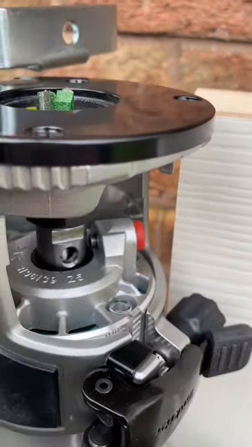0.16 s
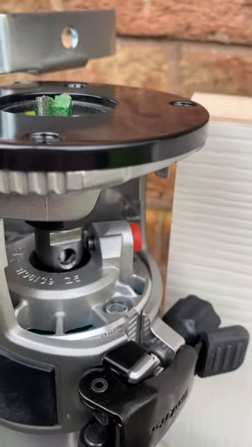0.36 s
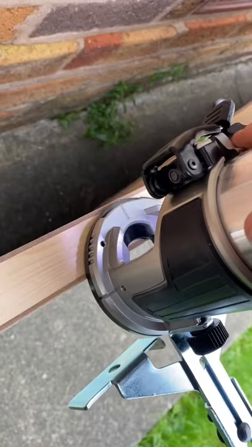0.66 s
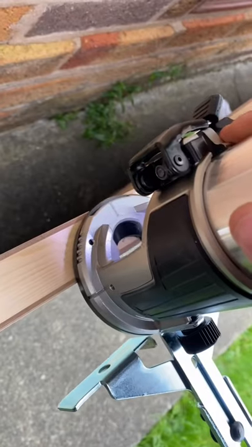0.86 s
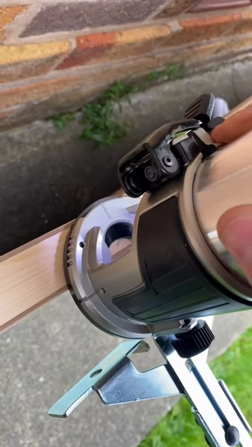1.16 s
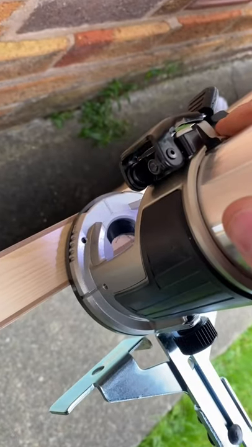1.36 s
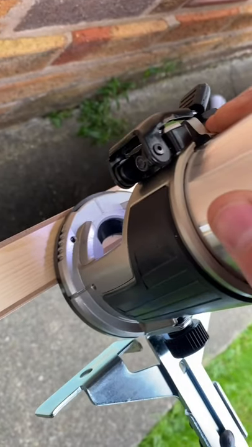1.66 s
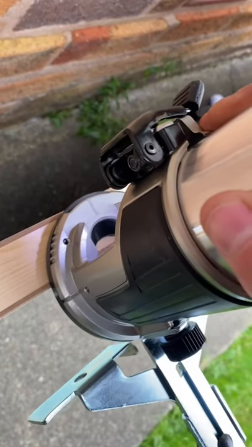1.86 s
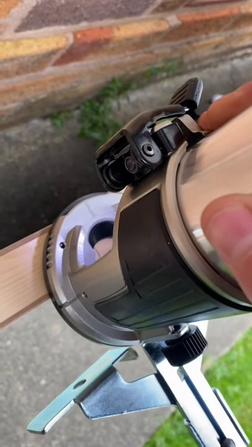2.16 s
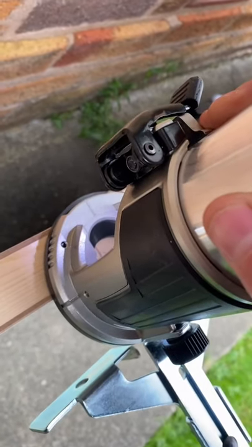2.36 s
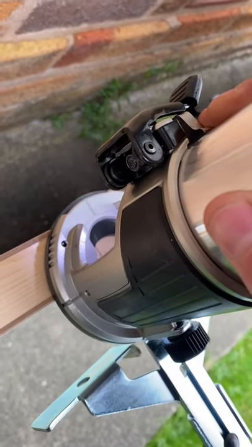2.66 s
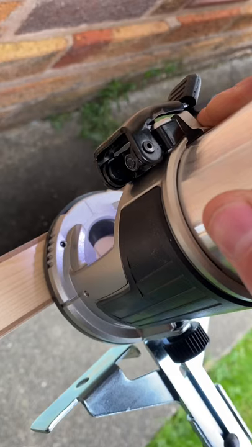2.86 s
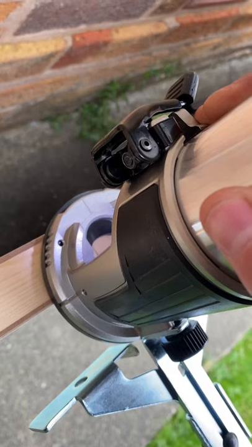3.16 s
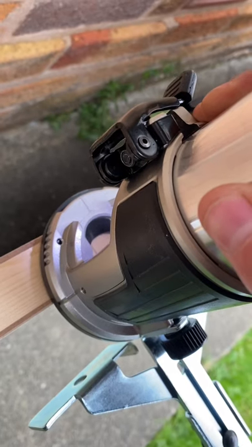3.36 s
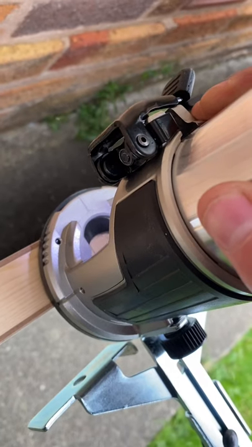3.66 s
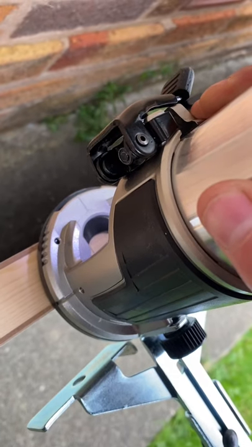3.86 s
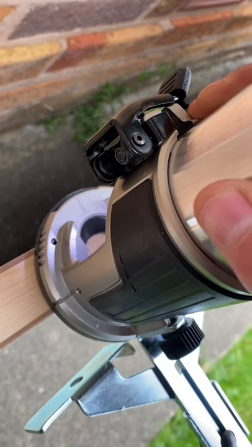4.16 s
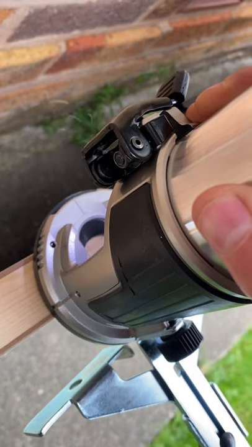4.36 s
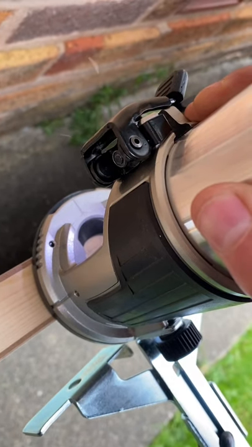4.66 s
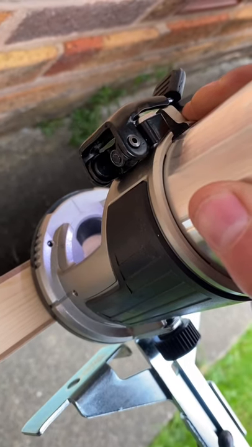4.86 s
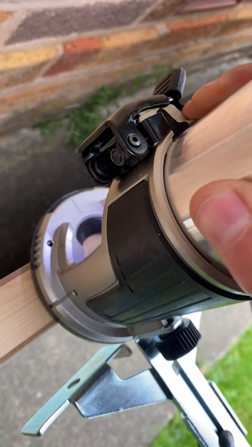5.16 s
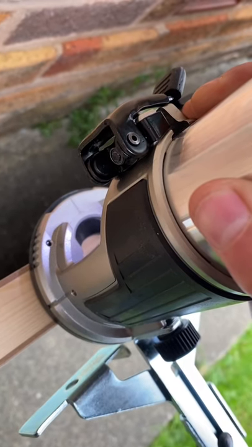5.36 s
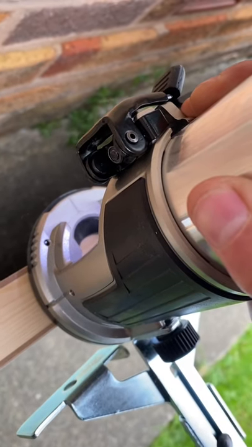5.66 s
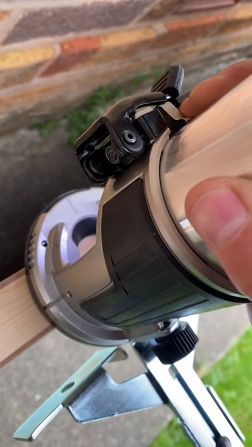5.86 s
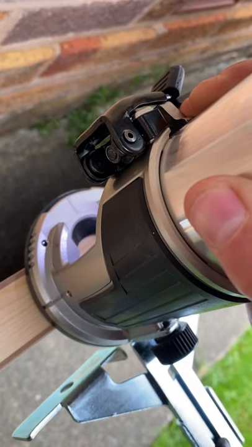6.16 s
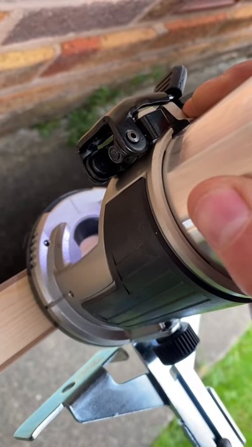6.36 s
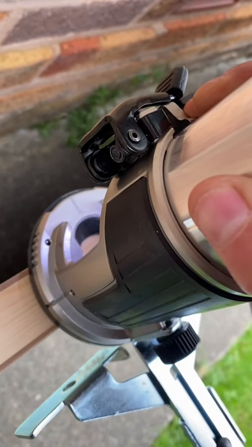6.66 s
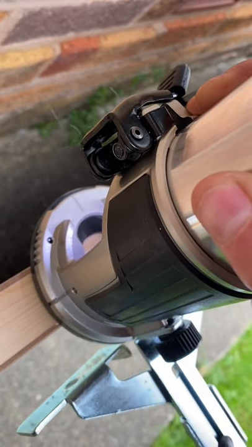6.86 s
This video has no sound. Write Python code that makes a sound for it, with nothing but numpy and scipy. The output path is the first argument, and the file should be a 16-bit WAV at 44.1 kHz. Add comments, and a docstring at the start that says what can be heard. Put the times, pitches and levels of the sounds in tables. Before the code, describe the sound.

After half a second of quiet outdoor air with a small knock, a palm router bursts in at full speed, whining steadily while trimming a wooden edge.

```python
"""Palm router on a door edge

A cordless palm router trims a wooden door's edge, close to a phone with two microphone ports.
A quiet half second outdoors holds a small knock; then the motor is there at once, near 29000 rpm.
Partials locked to the shaft make whine, hum and rasp, and a bearing tone beats against the whine.
Noise shaped by resonances makes the rush of air and chips; a shrill tone tracks the shaft.
The speed sags a little in the cut, and low noise under brief swells makes a buffeting breeze."""
import sys
import numpy as np
from scipy import signal
from scipy.fft import rfft, irfft
from scipy.io import wavfile

SR = 44100
rng = np.random.default_rng(int(sys.argv[2]) if len(sys.argv) > 2 else 0)


def to_wav(s):
    """Save 16-bit WAV."""
    ch = np.atleast_2d(s).T  # columns
    pcm = np.round(np.clip(ch, -1, 1) * 32767)  # PCM
    wavfile.write(sys.argv[1], SR, pcm.astype(np.int16))


N = 309582
T = np.arange(N) / SR
FREQ = np.maximum(np.fft.rfftfreq(N, 1 / SR), 1)
SIDES = np.array([[1], [-1]])  # left, right
CUT_S = .5448  # the router is heard from here


def router():
    """Common drive: one shaft turns every part, and the sag of its speed measures the load of the cut."""
    # shaft speed, which sags as the bit is pushed into the wood: t/s, f/Hz
    speed = [(.55, 489.2), (1.25, 489.6), (1.5, 490.3), (1.92, 490.4), (2.08, 489), (2.2, 486.5),
             (2.45, 484.9), (2.62, 485.1), (3.0, 483.3), (3.2, 481.2), (3.5, 479.7), (3.78, 481),
             (3.98, 479.7), (4.5, 480.5), (4.8, 482.6), (5.07, 482.3), (5.3, 485), (5.6, 484.2),
             (5.92, 488), (6.27, 488), (6.9, 483.7)]
    # fan whine, then bearing tone: level running free at the start/dB, change at full load/dB,
    # growth along the cut/(dB per s)
    whine_rule = (-30.5, 1, 0.43)
    ball_rule = (-38.7, -5.5, .95)
    free_hz, loaded_hz = 491, 480  # speeds that count as no load and full load
    shaft_hz, = curves(speed)
    load = np.clip((free_hz - shaft_hz) / (free_hz - loaded_hz), 0, 1)
    turns = np.cumsum(shaft_hz + 0.35 * walk(15.3)) / SR
    tones = motor(turns, load, loaded(whine_rule, load))
    tones = tones + bearing(turns, loaded(ball_rule, load))
    return ports(tones) + harmonics(turns, load) + shrill(shaft_hz) + rush(turns, load)


def motor(turns, load, whine_db):
    """Harmonic series: fan, shaft and bit sound at whole multiples of the shaft speed."""
    # octave of the whine, which fades as the tool moves along: t/s, level/dB
    octave_level = [(.55, -29.3), (1.25, -27), (2.2, -29), (2.55, -33), (2.9, -31.5), (3.3, -35.5),
                    (3.8, -33.5), (4.5, -39.5), (5.7, -38.5), (6.2, -35.5), (6.8, -40)]
    # hum of the unbalanced shaft, once a turn: t/s, level/dB
    hum_level = [(.55, -45.7), (1.55, -43.2), (2.0, -46), (2.3, -51.5), (3.6, -51), (5.6, -46.7),
                 (5.9, -43.2), (6.5, -41.2), (7, -43.7)]
    # second harmonic, the flutes whirring freely until the bit bites: t/s, level/dB
    flute_level = [(.55, -37.5), (1.6, -40), (2.1, -38), (2.6, -37.5), (3.2, -45.5), (4.6, -46), (5.9, -43),
                   (6.8, -38.5)]
    # third harmonic, the drone of the bit as it bites: t/s, level relative to bite_base_db/dB
    bite_level = [(.55, -59), (2.3, -45), (2.55, -35.5), (3.0, -32.5), (4.2, -36), (4.8, -33.5), (5.1, -40),
                  (5.5, -34.5), (7, -42)]
    # fifth harmonic and its octave, a rasp that comes and goes in the cut:
    # t/s, level and level of the octave, both relative to rasp_base_db/dB
    rasp_levels = [(.55, -44, -54), (2.25, -44, -52), (2.65, -38.5, -39), (3.0, -42, -41),
                   (3.4, -35.5, -40), (3.75, -42, -47), (4.4, -47, -53), (4.75, -44, -43), (6.05, -44, -47),
                   (6.5, -38, -45), (6.8, -40, -42), (7, -42, -45)]
    bite_base_db, rasp_base_db = -.7, -1.5
    whine = tone(4 * turns, whine_db, waver_db=.5, rough=.1)
    octave = tone(8 * turns, curves(octave_level)[0], waver_db=.4, rough=.12 + .18 * load)
    hum = tone(turns, curves(hum_level)[0], waver_db=1.0, rough=.25)
    flutes = tone(2 * turns, curves(flute_level)[0], waver_db=.8, rough=.4)
    bite = tone(3 * turns, bite_base_db + curves(bite_level)[0], waver_db=-1.5, rough=0.34)
    rasp = sum(tone(k * turns, rasp_base_db + db, waver_db=1.2, rough=.4)
               for k, db in zip((5, 10), curves(rasp_levels)))
    return whine + octave + hum + flutes + bite + rasp


def harmonics(turns, load):
    """Directional radiation: each weaker harmonic has its own phase lag between the ports."""
    # multiple of shaft speed, level running free/dB, change at full load/dB,
    # change by the end of the cut/dB, phase by which left leads/rad
    orders = [(6, -46.5, 9.5, -8.5, -2), (7, -43, 2, -7, -1.5), (9, -51.5, 10, -1, 2.5),
              (11, -52, 0, -2, 2.5), (14, -61, 0, -2, 2.8), (16, -57, 1, -5, -5.5)]
    total = 0
    for k, db, load_db, late_db, lead in orders:
        port_turns = round(k) * turns + SIDES * lead / (4 * np.pi)
        level_db = db + load_db * load + slide(0, late_db)
        total = total + tone(port_turns, level_db, waver_db=1.0, rough=0.22)
    return total


def bearing(turns, ball_db):
    """Beating: slightly slipping balls pass just off the fourth harmonic, about 48 beats a second."""
    # ball-pass tone and its shaft sidebands: multiple of shaft speed
    ball_orders = (4.098, 4.9, 5.1)
    # the same tones: level relative to ball_db/dB
    order_levels = (1, -19, -23)
    slip_hz = 1.8  # rms
    slip = np.cumsum(slip_hz * walk(13.2)) / SR
    return sum(tone(k * turns + slip, ball_db + db, waver_db=1.0, rough=.15)
               for k, db in zip(ball_orders, order_levels))


def rush(turns, load, chop=0.082, chip_db=-10, chip_rate=4000, flutter_db=0.46):
    """Source and filter: air noise and chip impulses, pulsing once a turn, ring housing and base."""
    # broad colour of the rushing air: f/Hz, density/(dB per Hz)
    air_colour = [(30, -40), (70, -24), (130, -15.5), (200, -17.3), (400, -11.6), (620, -6.2), (900, .8),
                  (1400, -9.2), (2000, -5.1), (3700, -6.4), (5000, -4.5), (7000, -6.4), (7550, -3),
                  (8100, -6.8), (9700, -12.1), (11300, -9.9), (15500, -18.3)]
    # resonances and dips of housing and base: f/Hz, width/Hz, lift early in the cut/dB, lift late/dB
    housing = [(234, 73, 6.3, 6.4), (530, 50, 2.5, 2.5), (650, 70, -1.8, -1.8), (770, 38, 1.4, 1.1),
               (1000, 90, 1.2, 1.2), (1156, 119, 8.5, 7.6), (1374, 207, 14.6, 15.8), (1670, 240, 7, 6.3),
               (2098, 97, -5.4, -7.2), (2231, 167, 9.6, 8.9), (2410, 90, -1.5, 5), (2703, 188, 2.5, -1.5),
               (3009, 362, 6.5, 9), (3290, 150, -5.2, 1.2), (3547, 130, -4, 2.8), (3871, 274, 6.4, .6),
               (4081, 245, -4.4, -2.8), (4343, 112, -1.5, -5.1), (4848, 285, 2.4, 1.3), (5239, 120, -3, -1),
               (5423, 334, 3.3, -2.8), (5650, 200, 1.2, 2.2), (6302, 155, 2.3, 2.6), (6663, 303, 3.2, 3),
               (8888, 432, 3.9, 2.4)]
    # close echoes off base, door and brick wall: delay/s, level/dB
    reflections = [(.0024, -26), (.0041, -24), (.0082, -25), (.0112, -28)]
    # hollow ring of the opening in the base as it slides onto the wood: t/s, f/Hz, level/dB
    opening = [(2.9, 2900, -52), (3.6, 2950, -43), (4.4, 3040, -39), (5.6, 3100, -35.5), (7, 3150, -36.5)]
    level_db = -23.5 - 0.15 * load
    treble_db = 1.25 - 1.1 * load
    air = rng.standard_normal((2, N))
    # chips strike at random instants, chip_rate of them a second on average
    chips = (rng.random((2, N)) < chip_rate / SR) * rng.standard_normal((2, N))
    pulse = 1 + chop * np.sin(2 * np.pi * turns)
    drive = (air + undb(chip_db) * unit(chips)) * pulse * undb(flutter_db * walk(26))
    echoes = 1 + sum(undb(db) * np.exp(-2j * np.pi * FREQ * s) for s, db in reflections)
    lifts = sum(np.outer(dbs, abs(resonance(hz, width)) ** 2) for hz, width, *dbs in housing)
    early, late = (unit(shape(drive, undb(colour(air_colour) + lift) * echoes)) for lift in lifts)
    sound = slide(early, late)
    # the growl of the housing throbs
    growl = shape(sound, abs(resonance(1150, 700)) ** 2) * .13 * walk(60)
    # the spray of dust comes unevenly, a puff each turn, and lifts the top
    puff_db = treble_db + .6 * walk(30) + .35 * np.sin(2 * np.pi * turns)
    spray = shape(sound, 1 / (1 + (8500 / FREQ) ** 6)) * (undb(puff_db) - 1)
    hollow_hz, hollow_db = curves(opening)
    hollow = np.array([ring(hollow_hz, width_hz=110) for _ in range(2)]) * undb(hollow_db)
    return ports(*((sound + growl + spray) * undb(level_db) + hollow))


def shrill(shaft_hz, drift_hz=6, flutter_hz=22, late_pan_db=-10):
    """Inharmonic shaft order: a shrill tone, probably a second bearing, steadier and to the right late."""
    # shrill tone near 9.65 times shaft speed: t/s, level/dB, multiple of shaft speed, steadiness/0-1
    shrill_course = [(.55, -42, 9.65, 0), (.95, -36, 9.63, .2), (1.3, -33, 9.635, .3),
                     (1.65, -33, 9.64, .4), (1.95, -41, 9.64, .1), (2.25, -39, 9.64, .2),
                     (2.6, -45, 9.65, 0), (3.7, -52, 9.65, 0), (4.9, -43, 9.68, .3),
                     (5.35, -38.5, 9.69, .8), (5.9, -36, 9.7, .8), (6.2, -40.5, 9.71, .6),
                     (6.65, -38, 9.71, .8), (7, -40.5, 9.71, .7)]
    # fainter, higher shrill tone: multiple of shaft speed, level/dB, width/Hz
    upper_shrill = (13.76, -45, 30)
    db, order, steady = curves(shrill_course)
    hz = order * shaft_hz + drift_hz * walk(3.01)
    line = tone(np.cumsum(hz) / SR, 0, waver_db=1.2, rough=.3)
    lower = np.sqrt(steady) * line + np.sqrt(1 - steady) * ring(hz, flutter_hz)
    pan = undb(SIDES * slide(0, late_pan_db) / 2)
    pan = pan / np.sqrt(np.mean(pan ** 2, axis=0))  # keeps the power of the pair
    upper_order, upper_db, upper_width_hz = upper_shrill
    upper = ring(upper_order * shaft_hz, upper_width_hz) * undb(upper_db)
    return ports(lower * undb(db)) * pan + ports(upper)


def scuff():
    """Friction noise: the base rubs the door once, a short, dull band under a bell-shaped swell."""
    # t/s at the peak, length/s, level/dB, f/Hz, width/Hz
    rub = (1.2, .075, -46, 180, 80)
    s, length, db, hz, width = rub
    return ring(hz, width_hz=width) * undb(db) * np.exp(-((T - s) / length) ** 2)


def breeze(flurry_db=-6):
    """Wind turbulence: low buffets nearly alike at both ports; stronger ones reach higher in pitch."""
    # colour of the wind: f/Hz, density/(dB per Hz)
    wind_colour = [(20, -26), (40, -3.5), (68, 2.5), (100, -4), (160, -14), (300, -36), (800, -45),
                   (3000, -78)]
    gust = gusts()
    mid, side = (unit(shape(n, undb(colour(wind_colour)))) for n in rng.standard_normal((2, N)))
    flurry_gain = undb(flurry_db) * np.sqrt(gust / gust.max()) * (T > CUT_S)
    flurry = ring(140, width_hz=48) * flurry_gain
    return (mid + flurry + 0.18 * side * SIDES) * gust


def gusts():
    """Power addition: an unsteady breeze and brief buffets, which swell and die alike, join as rms."""
    # steady breeze while the motor runs: t/s, level relative to base_db/dB
    steady_level = [(0.56, -77), (1.3, -60), (2.1, -50), (2.82, -61), (3.29, -51), (3.81, -59.5),
                    (4.92, -44.5), (5.28, -56), (6.34, -52), (7.0, -60)]
    # strongest buffets on top of it: t/s at the peak, level/dB, length/s
    buffet_list = [(0.285, -44, 0.026), (0.372, -46, 0.03), (1.483, -40.5, 0.03), (1.557, -48, 0.03),
                   (2.008, -47, 0.036), (2.093, -51, 0.029), (2.174, -41, 0.035), (2.259, -45, 0.036),
                   (2.435, -42.5, 0.05), (3.13, -49, 0.05), (3.383, -49, 0.046), (4.113, -47, 0.03),
                   (4.277, -41, 0.055), (4.432, -47, 0.041), (4.7, -37, 0.041), (4.806, -50, 0.045),
                   (4.977, -40, 0.036), (5.052, -45, 0.045), (5.27, -44, 0.05), (5.527, -41.5, 0.04),
                   (5.68, -39, 0.033), (5.877, -43, 0.047), (6.424, -48, 0.037)]
    before_db, base_db, waver_db = -52.5, -0.5, 2  # before the motor, base while it runs, unsteadiness
    steady_db = np.where(T < CUT_S, before_db, base_db + curves(steady_level)[0])
    buffets = sum(undb(db) * np.exp(-2 * ((T - s) / length) ** 2) for s, db, length in buffet_list)
    return np.hypot(undb(steady_db + waver_db * walk(5.1)), buffets)


def hush():
    """Impulse response: the tool ticks and knocks in the hand, over faint outdoor air."""
    # colour of the outdoor air: f/Hz, density/(dB per Hz)
    air_colour = [(88, -28), (150, -2), (300, -13), (649, -26), (1050, -26.5), (2400, -39), (5610, -40),
                  (11200, -40), (15000, -50)]
    # handling of the tool, a tick and then a knock in four resonances:
    # t/s, peak level/dB, ring f/Hz, width of each resonance pass/Hz, decay of the contact/s
    contacts = [(.361, -55, 4500, 1150, .0011), (.404, -48, 1200, 1100, .0012),
                (.404, -64, 4400, 1400, .0015), (.405, -44, 600, 260, .002), (.408, -41, 110, 110, .006)]
    air = unit(shape(rng.standard_normal((2, N)), undb(colour(air_colour))))
    out = ports(*air) * undb(np.interp(T, [0, .15], [-52, -65]))  # the level falls at the start
    for s, db, hz, width, decay in contacts:
        contact = rng.standard_normal(N) * (T >= s) * np.exp(-abs(T - s) / decay)
        knock = shape(contact, resonance(hz, width) ** 3)  # three passes
        out = out + undb(db) * knock / abs(knock).max()
    return out


def ports(direct, scattered=None):
    """Two-point pickup: lag, likeness and balance differ by pitch; balance shifts in the slide."""
    # between the two ports: f/Hz, phase by which left leads/rad, likeness/0-1,
    # left minus right early in the cut/dB, the same late/dB
    port_table = [(100, 0, .98, -.2, -.2), (180, -.1, .98, -.5, -.5), (350, -.25, .92, -1.8, -1.6),
                  (487, -.2, .65, 2.5, 2.8), (600, -.1, .96, -4.6, -4.8), (750, 0, .995, -.5, -.5),
                  (850, 0, .999, 0, 0), (2030, 0, .999, 0, 0), (2150, -.3, .8, -3, 0),
                  (2280, -.4, .93, -3.8, -.8), (2450, -1.1, .58, -4.6, -6.4), (2750, -2.5, .53, -6.3, -4),
                  (2900, -3.1, .65, -5, .5), (3050, -3.2, .88, -1.7, 2.2), (3220, -3.2, .4, 2, 7.5),
                  (3400, -3.1, .35, 0, 2), (3560, -5.6, .35, -.5, 2.5), (3720, -5.7, .5, -3, -3),
                  (3900, -5.6, .8, -1, -3), (4250, -5.4, .3, -2.6, -2), (4400, -4.6, .3, -2, -3.6),
                  (4700, -5.8, .55, -2.5, -3), (4850, -6, .8, -.5, -1.2), (5250, -6.1, .8, .4, 0),
                  (5750, -5.2, .66, .6, .3), (6300, -4.2, .68, .2, .3), (6750, -3.5, .82, 0, 0),
                  (7000, -3.2, .99, 0, 0), (8150, -3.1, .99, 0, 0), (8900, -1.8, .6, 0, 0),
                  (9800, -.1, .99, 0, 0), (11300, .1, .99, 0, 0), (12100, 1.8, .55, 0, 0),
                  (12800, 3.1, .99, 0, 0), (14400, 3.2, .99, 0, 0), (15700, 6.2, .8, 0, 0)]
    hz, *columns = np.transpose(port_table)
    lead, like, *pans_db = (np.interp(FREQ, hz, c) for c in columns)
    pair = rfft(direct)
    if scattered is not None:
        like = np.clip(like, 0, 1)
        common = pair * np.sqrt((1 + like) / 2)
        # opposite signs make the scattered part differ between the ports
        pair = common + SIDES * rfft(scattered) * np.sqrt((1 - like) / 2)
    pair = pair * np.exp(.5j * SIDES * lead)
    return slide(*(irfft(pair * undb(SIDES * pan_db / 2), N) for pan_db in pans_db))


def tone(turns, db, waver_db, rough):
    """Modulated partial: its level wavers slowly, and in-phase and quadrature noise roughens it."""
    angle = 2 * np.pi * (turns + rng.random())
    partial = (1 + rough * walk(60)) * np.sin(angle) + rough * walk(56) * np.cos(angle)
    return np.sqrt(2) * undb(db + waver_db * walk(4.1)) * partial


def ring(hz, width_hz):
    """Narrow-band noise: two slow noises in quadrature on a centre that may move; rms about 1."""
    angle = 2 * np.pi * np.cumsum(hz * np.ones(N)) / SR
    low_pass = 1 / (1 + (FREQ / width_hz) ** 2)  # halves the amplitude width_hz off the centre
    a, b = (unit(shape(n, low_pass)) for n in rng.standard_normal((2, N)))
    return a * np.sin(angle) + b * np.cos(angle)


def loaded(rule, load):
    """Load dependence: level in dB that follows the load and drifts steadily along the cut."""
    free_db, load_db, db_per_s = rule
    return free_db + load_db * load + db_per_s * (T - CUT_S)


def slide(early, late):
    """Linear cross-fade from early to late values as the tool moves along the edge."""
    # the slide: start t/s, end t/s
    slide_times = (1, 6)
    return early + (late - early) * np.interp(T, slide_times, [0, 1])


def walk(rate):
    """Low-passed noise: smooth chance that changes about rate times a second; rms 1."""
    return unit(shape(rng.standard_normal(N), np.exp(-(FREQ / rate) ** 2)))


def resonance(hz, width):
    """Damped oscillator: response of one mode, 1 at its centre."""
    return 1 / (1 + 1j * (FREQ ** 2 - hz ** 2) / (FREQ * width))


def shape(x, response):
    """Linear filtering: the spectrum is multiplied by a frequency response."""
    return irfft(rfft(x) * response, N)


def colour(points):
    """Spectral envelope: an outline of f/Hz, level/dB, drawn over log frequency, in dB."""
    hz, db = np.transpose(points)
    return np.interp(np.log(FREQ), np.log(hz), db)


def curves(table):
    """Linear interpolation: the columns of a time table, one value a sample."""
    s, *columns = np.transpose(table)
    return [np.interp(T, s, c) for c in columns]


def unit(x):
    """Normalisation to rms 1."""
    return x / np.sqrt(np.mean(x ** 2))


def undb(db):
    """Logarithmic level: decibels to amplitude gain."""
    return 10 ** (np.asarray(db) / 20)


def scene():
    """Superposition: the quiet opening fades out; after a short gap the running router is there."""
    fade_s, fade_length_s, rise_s = .501, 0.011, .002  # end of the fade, its length, router's rise
    before = np.clip((fade_s - T) / fade_length_s, 0, 1)
    after = np.clip((T - CUT_S) / rise_s, 0, 1)
    return before * hush() + after * (router() + scuff()) + (before + after) * breeze()


def record(dry):
    """Band limiting: the phone cuts the top with a steep elliptic low-pass."""
    top_hz = 15750
    return signal.sosfilt(signal.ellip(10, .1, 80, top_hz, fs=SR, output="sos"), dry)


dry = scene()
out = record(dry)
to_wav(out)
```